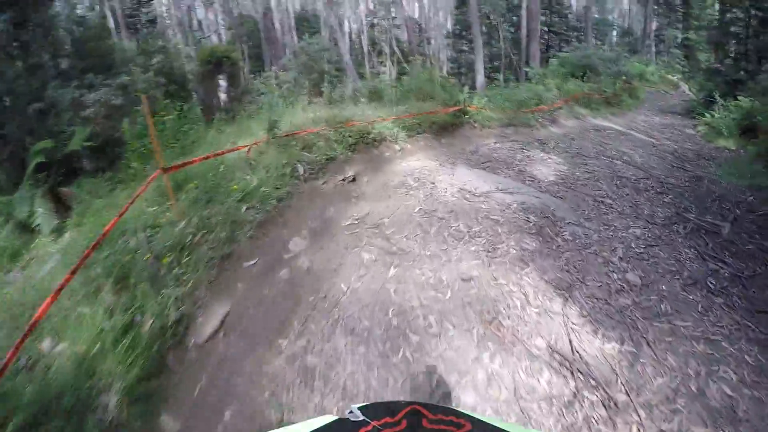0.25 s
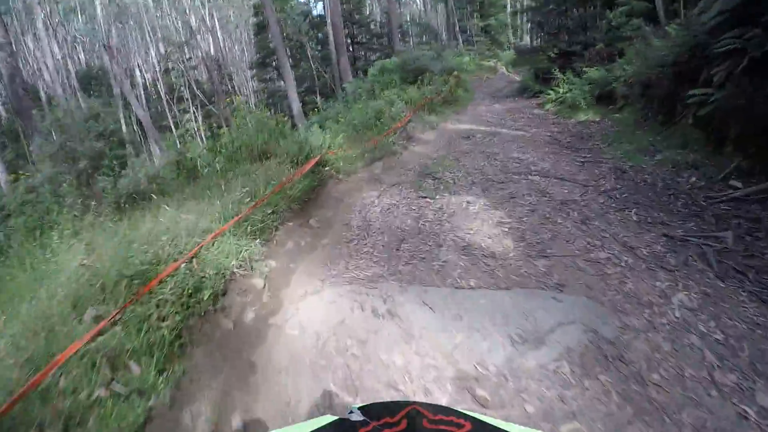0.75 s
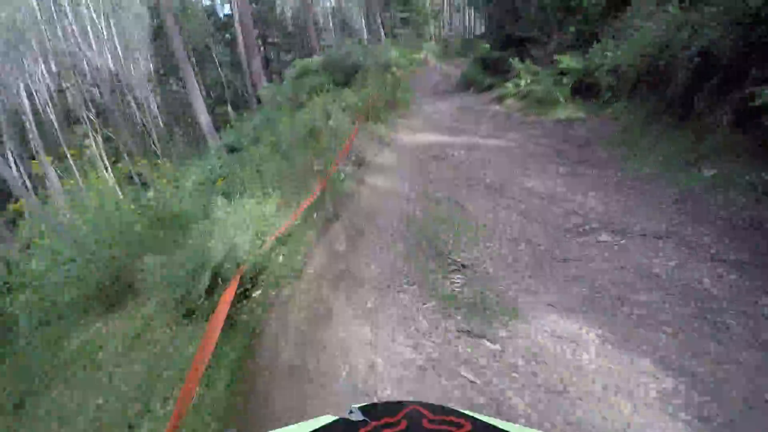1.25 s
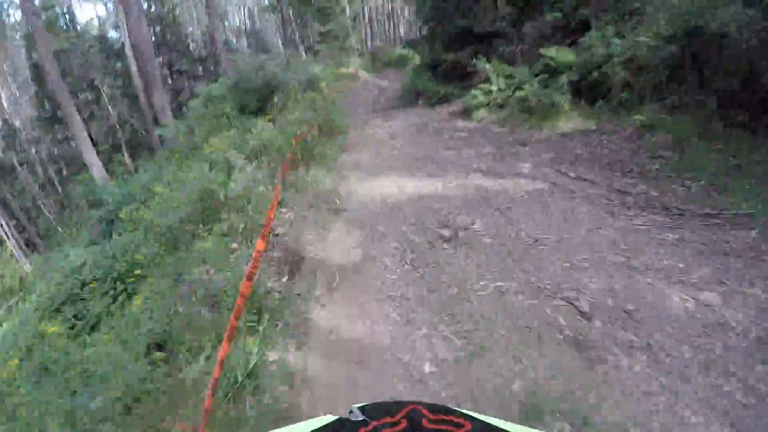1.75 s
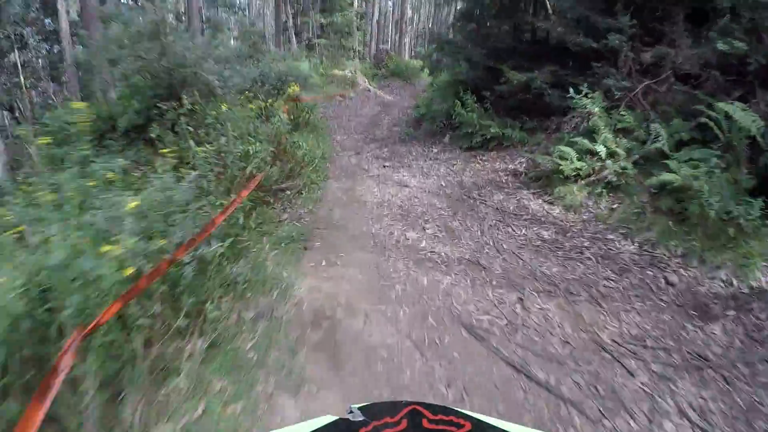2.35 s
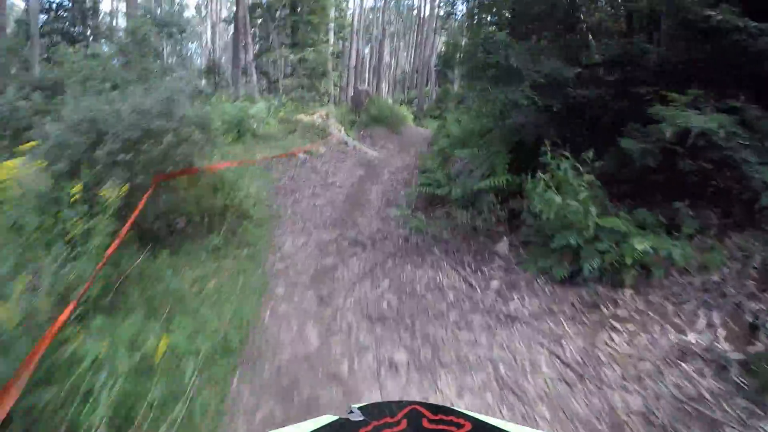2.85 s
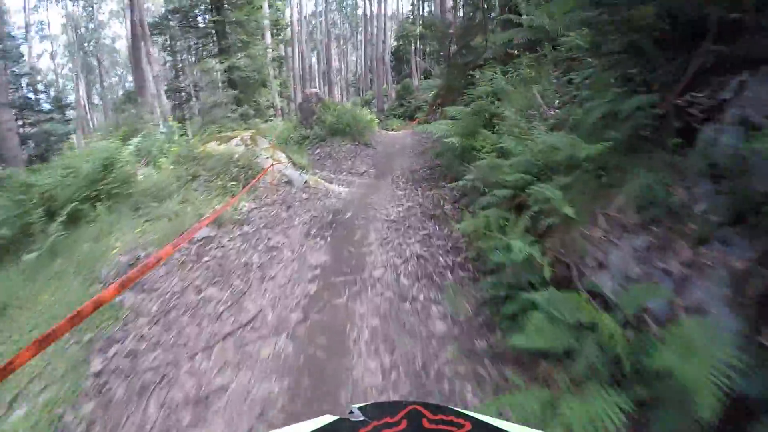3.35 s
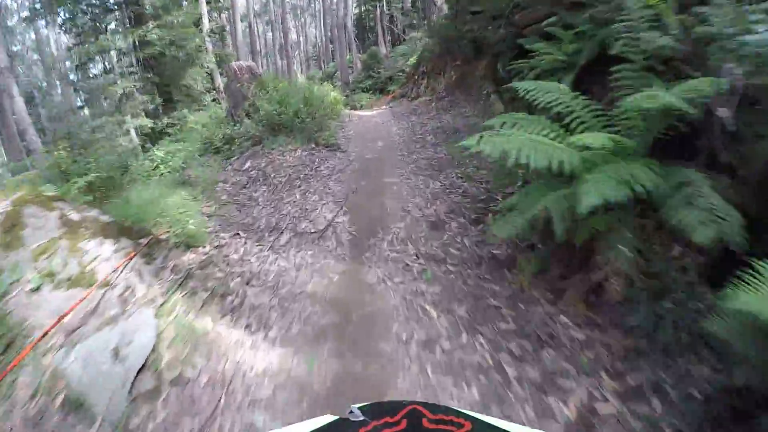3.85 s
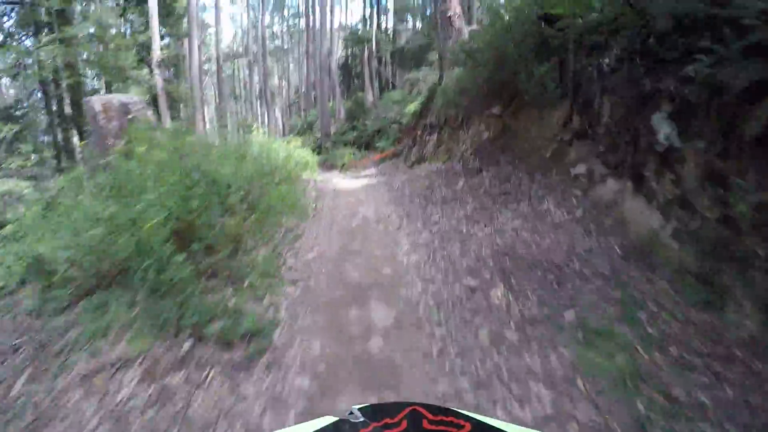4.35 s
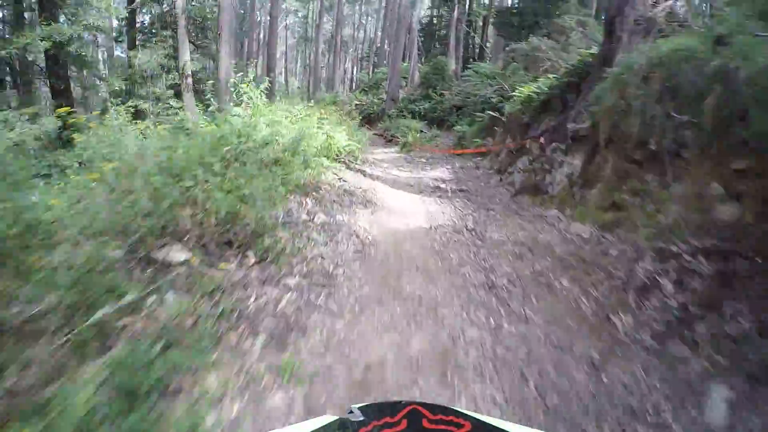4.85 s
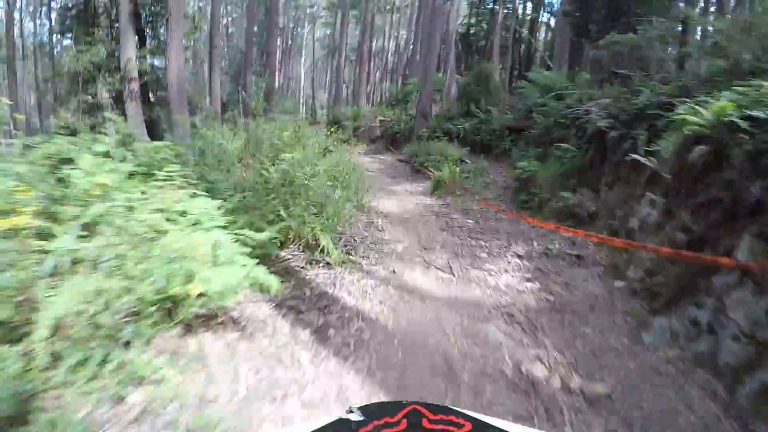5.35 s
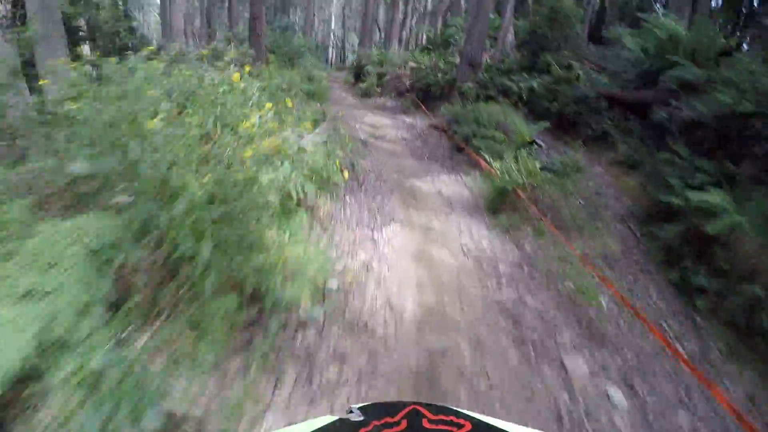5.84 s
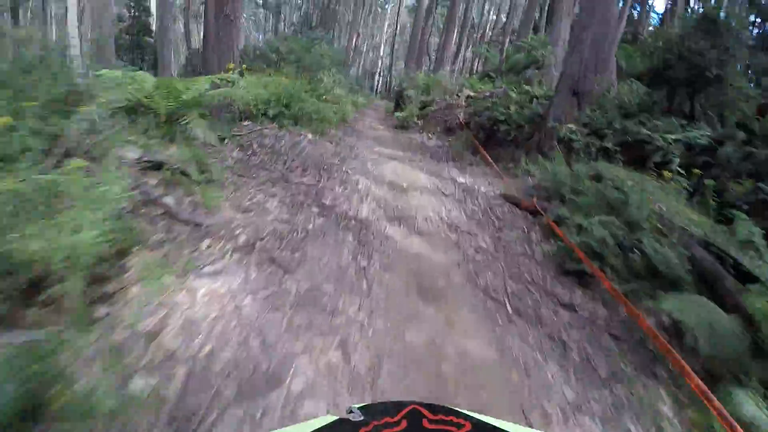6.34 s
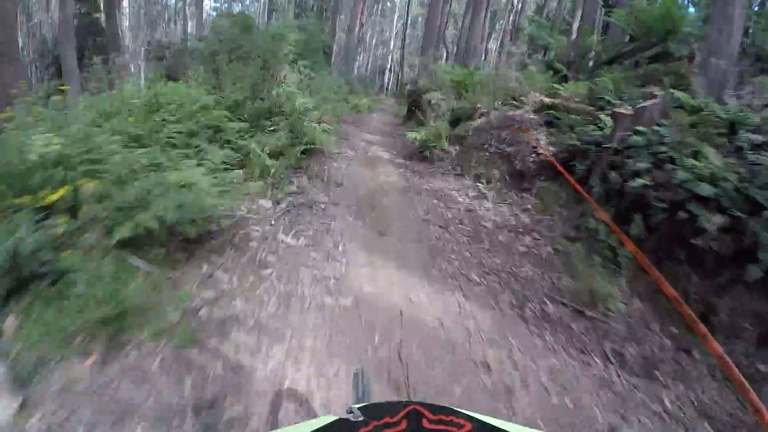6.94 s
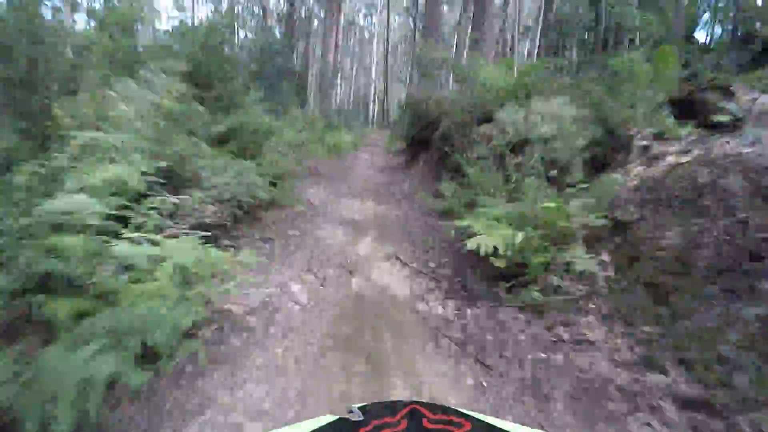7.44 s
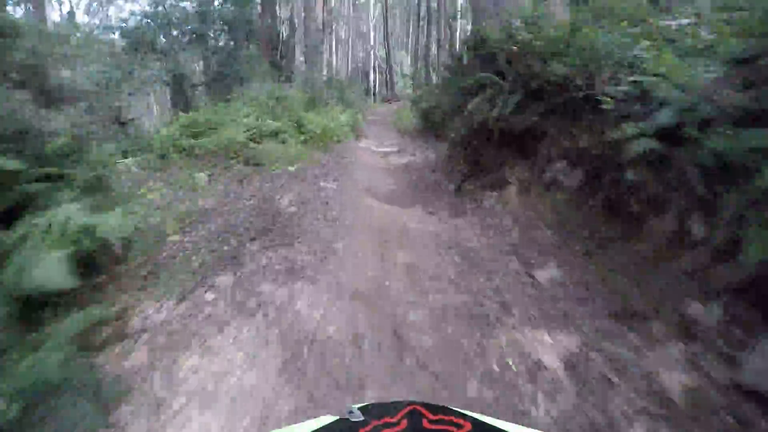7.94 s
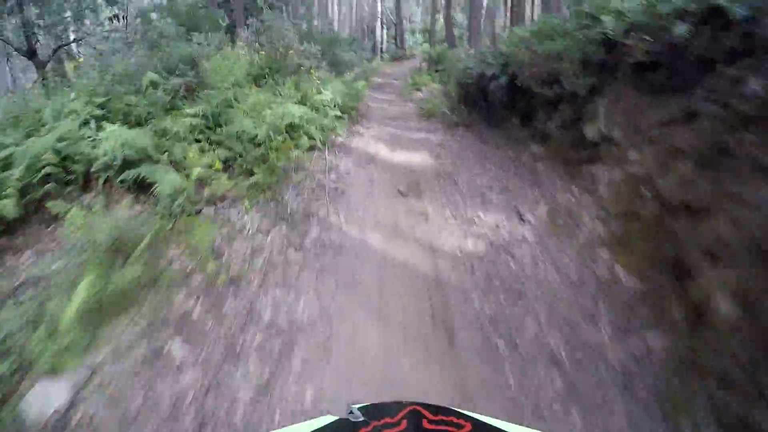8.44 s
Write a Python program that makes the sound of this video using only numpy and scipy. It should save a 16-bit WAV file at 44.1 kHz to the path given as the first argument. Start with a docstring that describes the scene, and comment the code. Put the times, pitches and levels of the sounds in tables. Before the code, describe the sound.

Wind buffets a helmet microphone for the whole of a fast mountain bike descent, nearly nine seconds, in irregular low gusts with a hollow drone and occasional dull thumps. Below it, tyres crunch faintly over dirt, with small twig snaps. In the first two seconds the tread scuffs briefly several times and the bike knocks over bumps, most clearly at about 0.1, 0.7 to 1.0 and 1.8 to 1.9 seconds. From about 1 second a fluttering hiss of air through the helmet's gaps rises with speed, and is strong by 3 seconds. A couple of faint snaps come near 4.4 seconds. At about 5.9 seconds a stone hits the bike with one loud, bright, very short crack. The rushing air then grows louder, surging hardest between 7.3 and 8 seconds, and carries on with the buffeting to the end.

```python
"""Mountain bike on a dirt trail

A fast descent, from a camera microphone on the rider's helmet. Right at the microphone, wind buffets
the housing and hisses through the helmet's gaps, louder and brighter with speed. A body's length
below, the tyres crunch over litter, the bike knocks on bumps, and one stone cracks sharply against it."""
import sys
import numpy as np
from scipy import signal
from scipy.fft import rfft, irfft, next_fast_len
from scipy.io import wavfile
from scipy.ndimage import uniform_filter1d, map_coordinates

SR = 44100
rng = np.random.default_rng(int(sys.argv[2]) if len(sys.argv) > 2 else 0)


def wrap_up_sound(samples):
    """Save the sound to the file named by the first command line argument, as 16-bit audio."""
    columns = np.atleast_2d(samples).T
    # keep every value between -1 and 1, then stretch to whole-number steps
    tamed = np.clip(columns, -1, 1)
    steps = np.round(tamed * 32767).astype(np.int16)
    wavfile.write(sys.argv[1], SR, steps)


N = 383229

# spectra of the tyres, rolling and sliding: (frequency [Hz], level [dB])
ROLL_SPECTRUM = [(120, 22), (300, -5), (750, -2), (1200, 0), (1600, -2), (2300, 6), (3000, -12),
                 (4200, -26.5), (6000, -27), (9000, -36)]
SCUFF_SPECTRUM = [(1000, -6.5), (1400, -1), (1900, 8), (2550, 6), (2850, -5), (3450, 4), (3900, -8),
                  (4700, -9), (6000, -18), (7200, -28), (7950, -14), (8700, -29), (14000, -36)]
# the tread scuffing over dirt: (time [s], level [dB], half-length [s], rasp pitch [Hz])
SCUFFS = [(0.032, -48.5, 0.2, 2010), (0.202, -51, 0.042, 3240), (0.44, -41, 0.02, 2570),
          (0.503, -43.5, 0.039, 2500), (0.624, -46.5, 0.023, 2480), (0.721, -50, 0.039, 2620),
          (0.808, -52, 0.056, 2150), (1.091, -47.5, 0.036, 2430), (1.276, -40, 0.047, 2000),
          (1.358, -49, 0.037, 2080), (1.743, -42.5, .022, 2200), (2.225, -61, 0.054, 2200)]
# bumps knocking the bike: (time [s], level [dB], hardness [dB per octave above the lowest mode])
KNOCKS = [(0.112, -32.5, -3), (0.508, -40, -5), (0.6769, -33, -7), (0.897, -30, -.5), (1.0008, -32, 2),
          (1.0624, -43, -5), (1.8148, -36, -2), (1.903, -33, -5)]
# the frame's ring: (frequency [Hz], level [dB], t60 [s])
FRAME_MODES = [(1130, -1.5, .027), (1450, 1, .013), (1900, 1, .011), (2190, -1, .018), (2560, -8, .013),
               (3200, -11, .014), (4030, -13, .012)]
# twigs and grit snapping under the tyres: (time [s], level [dB], pitch [Hz])
SNAPS = [(.188, -49, 3900), (0.22, -40, 2830), (.223, -55, 5300), (0.441, -48, 5000), (0.472, -52, 5500),
         (.481, -50, 7200), (0.49, -41, 2900), (0.491, -41.5, 5000), (.492, -52, 8500), (.643, -50, 3900),
         (.924, -50, 4700), (1.623, -52, 4800), (1.691, -52, 5000), (1.786, -49, 5360), (1.829, -51, 7800),
         (1.892, -53, 5000), (2.087, -46, 5330), (2.73, -52, 7400), (4.359, -41, 5500), (4.385, -40, 5500),
         (8.57, -38, 7950), (8.571, -47, 13500)]
# a stone's strike: (time [s], level [dB])
STONE_STRIKES = [(5.8803, 1.5)]
# its ring, the low modes coming last: (frequency [Hz], level [dB], t60 [s], delay [s])
STONE_MODES = [(2300, -13, .005, .0008), (2660, -3, .005, .0008), (2940, -14, .008, .003),
               (4900, -8, .0055, 0), (5390, 0, .002, 0), (6050, -12, .003, 0), (6800, -1, .0022, 0),
               (7350, -5, .003, 0), (7900, -6, .0035, 0), (11200, 0, .0013, 0), (13400, -1, .0013, 0)]

# spectra of the wind on the microphone: (frequency [Hz], level [dB])
EDDY_SPECTRUM = [(8, -24), (17, 5.5), (23, 9.5), (30, 5.5), (40, 0), (52, -6.5), (70, -28.5), (110, -50),
                 (250, -67), (600, -100)]
BURBLE_SPECTRUM = [(60, 0), (130, -2), (220, -2.5), (400, -12), (900, -19), (2500, -58)]
DRONE_SPECTRUM = [(35, -67), (58, -5.5), (85, 4.5), (97, -1), (112, -20.5), (150, -43), (250, -60),
                  (700, -79)]
THUMP_SPECTRUM = [(50, -16), (100, 12), (200, -3), (400, -13.5), (1200, -48), (3000, -120)]
# gusts that buffet the microphone: (time [s], level [dB], half-length [s])
GUSTS = [(0.12, -17.5, 0.024), (0.355, -12.5, 0.022), (0.458, -9.5, 0.037), (0.594, -13.5, 0.015),
         (0.802, -20, 0.091), (1.087, -15.5, .035), (1.235, -12.5, 0.051), (1.382, -13, 0.028),
         (1.508, -10, .03), (1.768, -15.5, 0.065), (1.912, -15.5, .06), (2.058, -7.5, 0.035),
         (2.343, -14.5, 0.018), (2.583, -17, 0.049), (2.714, -12, 0.037), (2.914, -18.5, 0.081),
         (3.037, -9.5, 0.031), (3.367, -11.5, 0.026), (3.487, -12.5, 0.017), (3.919, -19, 0.021),
         (4.004, -12.5, 0.023), (4.092, -8.5, .03), (4.228, -12.5, 0.047), (4.338, -9, 0.036),
         (4.446, -11.5, 0.033), (4.68, -19, 0.04), (4.831, -11, 0.042), (5.07, -13.5, 0.045),
         (5.161, -14, 0.025), (5.388, -10, 0.059), (5.613, -21, 0.035), (5.74, -14, 0.13),
         (5.974, -9, 0.032), (6.115, -12.5, .035), (6.245, -10.5, 0.033), (6.42, -9, 0.071),
         (6.59, -17, 0.065), (6.702, -7.5, 0.042), (6.843, -8, 0.015), (7.046, -17.5, 0.027),
         (7.471, -8, 0.049), (7.588, -13, 0.039), (7.745, -18, 0.076), (7.944, -9, 0.065), (8.2, -10, 0.05),
         (8.372, -8.5, 0.037), (8.601, -9, 0.047)]
# lulls in the eddies between them: (time [s], drop [dB], half-length [s])
LULLS = [(.25, 8, 0.053), (.7, 3.5, 0.11), (2.43, 5, 0.064), (7.2, 10, 0.27)]
# the drone of the microphone's housing: (time [s], level [dB])
DRONE_LEVEL = [(0.05, -69), (0.24, -38), (0.28, -58), (0.42, -24), (0.67, -48), (1.06, -52), (1.52, -33),
               (1.67, -50), (1.71, -35), (1.95, -46), (2.1, -30), (2.16, -58), (2.22, -29), (3.15, -36),
               (4.35, -34.5), (4.46, -23.5), (4.54, -48), (4.62, -37), (5.9, -34), (5.95, -22), (6.07, -40),
               (6.22, -27), (6.3, -39), (6.63, -32), (6.65, -21), (6.82, -39), (6.84, -29.5), (7.0, -45),
               (7.1, -36), (7.466, -24), (7.68, -39), (7.706, -26.5), (7.826, -35), (7.878, -22.5),
               (8.096, -42), (8.198, -19), (8.254, -49), (8.356, -22.5), (8.502, -42), (8.6, -27.5),
               (8.69, -38)]
# gusts that thump the microphone: (time [s], level [dB])
THUMPS = [(0.416, -31), (0.463, -42), (2.5, -29.5), (4.424, -42), (4.452, -25), (5.387, -29), (6.745, -25),
          (6.844, -31), (7.448, -25.5), (7.906, -29)]

# the air stream past the helmet, rising as the bike gathers speed: (time [s], level [dB])
STREAM_LEVEL = [(0.93, -62), (1.1, -48.5), (1.19, -56), (1.23, -46), (1.47, -49), (1.58, -42.5),
                (1.64, -49.5), (1.84, -41.5), (2.35, -39), (2.38, -36), (2.83, -37.5), (2.89, -34),
                (2.98, -34.5), (3.03, -30.5), (3.05, -33), (3.09, -32), (3.43, -33.5), (3.5, -29.5),
                (3.59, -33), (3.83, -32.5), (4.11, -34.5), (4.13, -31.5), (4.32, -28), (4.41, -33),
                (4.45, -27.5), (4.56, -38.5), (4.86, -35), (5.32, -34.5), (5.42, -29.5), (5.92, -33),
                (5.94, -26.5), (6.05, -28), (6.07, -29), (6.14, -24.5), (6.35, -27.5), (6.4, -25.5),
                (6.46, -28.5), (6.48, -23), (6.5, -31.5), (6.57, -32.5), (6.59, -29), (7.04, -33),
                (7.24, -26), (7.46, -25), (7.48, -18), (7.58, -21), (7.63, -25.5), (7.69, -29), (7.72, -23),
                (7.74, -18.5), (7.8, -26.5), (7.89, -21), (8.45, -26), (8.49, -31), (8.58, -23.5),
                (8.69, -28.5)]
# low roar and treble spray, over what the stream alone gives: (time [s], level [dB])
ROAR_BOOST = [(1.2, -7), (2.3, 0.5), (5.5, -0.5), (6.5, -0.5), (7.05, -2), (7.22, 5), (7.4, 9), (7.56, -2),
              (7.9, -4.5), (8.68, -5)]
SPRAY_BOOST = [(0, 5), (1.2, -8), (2.5, -4), (4.2, -3.5), (5.2, 2), (6.3, 5), (7.4, 0.5), (8.68, 2)]
# spectra of the wind on the helmet: (frequency [Hz], level [dB])
ROAR_SPECTRUM = [(70, -4), (130, 4), (220, -1.5), (300, -6), (390, -4.5), (500, -10), (750, -14),
                 (1200, -5.5), (3000, -52)]
RUSH_SPECTRUM = [(400, -15), (900, -13.5), (1120, -8.5), (1400, -8.5), (1850, -1.5), (2400, 1), (2780, -4),
                 (3500, -8), (4020, -26), (4400, -16.5), (6500, -31), (9000, -73)]
SPRAY_SPECTRUM = [(3000, -1.5), (4100, -3.5), (4500, -1), (6000, -3), (8000, -8), (9200, -10.5),
                  (10500, -14), (12700, -16.5), (14900, -31), (15600, -45)]
# air resonances of the helmet's gaps, main and higher: (frequency [Hz], width [Hz], level [dB])
GAP_MODES = [(3030, 370, -1), (3333, 450, -2), (3604, 336, -3.5)]
EDGE_MODES = [(4360, 250, 10), (4850, 220, -0.5), (5624, 300, 10), (6500, 160, -3), (7020, 220, -6),
              (7820, 430, -3), (10700, 420, -8)]

# how each wind sound follows the stream: (base level at cruising speed [dB], growth [dB per dB])
EDDY_LAW, ROAR_LAW, RUSH_LAW = (-21, 0.033), (-46, 0.46), (-33, 0.7)
HISS_LAW, WHISTLE_LAW, SPRAY_LAW = (-30.5, 1), (-75, 1.3), (-49.5, 0.88)
CRUISE_DB = -30.5  # the stream's strength at cruising speed


def amp(db):
    """Decibels to gain."""
    return 10 ** (np.asarray(db) / 20)


def unit(x):
    """Scale to rms 1."""
    return x / np.sqrt(np.mean(x ** 2) + 1e-20)


def curve(points):
    """(time, value) points joined by straight lines, one value a sample."""
    return np.interp(np.arange(N) / SR, *np.transpose(points))


def wobble(rate):
    """A smooth random curve, rate knots a second."""
    return map_coordinates(rng.standard_normal(N // 16), [np.arange(N) * rate / SR], mode="wrap")


def swell(s, half_length):
    """A bell-shaped envelope around time s."""
    return np.exp(-np.minimum(((np.arange(N) / SR - s) / half_length) ** 2, 20))


def swells(rows):
    """Sum of (time, height, half-length) bells."""
    return sum(height * swell(s, half_length) for s, height, half_length in rows)


def filtered(x, response):
    """Filter x by a gain given as a function of frequency."""
    size = next_fast_len(len(x) + SR // 4)
    return irfft(rfft(x, size) * response(np.fft.rfftfreq(size, 1 / SR)), size)[:len(x)]


def coloured(x, spectrum):
    """x shaped by (Hz, dB) points on a log axis, at rms 1."""
    points_hz, db = np.transpose(spectrum)
    return unit(filtered(x, lambda hz: amp(np.interp(np.log(hz + 1), np.log(points_hz), db))))


def noise(spectrum, samples=N):
    """Steady noise of the given spectrum, at rms 1."""
    return coloured(rng.standard_normal(samples), spectrum)


def band(hz, centre_hz, width_hz):
    """Gain of a steep-sided resonance."""
    return 1 / (1 + ((hz ** 2 - centre_hz ** 2) / ((hz + 1) * width_hz)) ** 2)


def peaks(modes, hz):
    """Summed gain of several resonances."""
    return sum(amp(db) * band(hz, centre, width) for centre, width, db in modes)


def turbulence(rate, depth_db):
    """White noise that comes in irregular puffs, rate a second."""
    return rng.standard_normal(N) * amp(depth_db * wobble(rate))


def swirl(spectrum, evenness):
    """Low pressure swings of random period and fairly even strength."""
    swings = noise(spectrum)
    power = uniform_filter1d(np.abs(signal.hilbert(swings)) ** 2, size=SR // 32)
    return unit(swings / (np.sqrt(np.abs(power)) + 0.025) ** evenness)


def driven(law):
    """Gain of a sound that grows with the air stream, which takes a moment to change."""
    base_db, growth = law
    stream_db = uniform_filter1d(curve(STREAM_LEVEL), size=SR // 22)
    return amp(base_db + growth * (stream_db - CRUISE_DB))


def microphone_hiss():
    """The microphone's own faint hiss."""
    return amp(-69.5) * noise([(1000, 4.5), (14800, 1.5), (15600, -30)])


def buffeting(ceiling=0.7):
    """Gusts push on the microphone over weaker eddies; the hardest thump, and its hollow housing drones."""
    bed = driven(EDDY_LAW) * amp(2.5 * wobble(12) - swells(LULLS))
    gusts = swells([(s, amp(db), half_length) for s, db, half_length in GUSTS])
    eddies = np.hypot(bed, gusts) * swirl(EDDY_SPECTRUM, evenness=1)
    drone = amp(curve(DRONE_LEVEL) + 0.5 + 1.8 * wobble(14)) * swirl(DRONE_SPECTRUM, evenness=0.3)
    thumps = swells([(s, amp(db - 3.5), 0.0071) for s, db in THUMPS]) * swirl(THUMP_SPECTRUM, evenness=1)
    burble = amp(-40) * eddies * noise(BURBLE_SPECTRUM)  # the rough edge of each eddy
    pressure = eddies + burble + drone + thumps
    return pressure / (1 + (pressure / ceiling) ** 4) ** 0.25  # rounds off the biggest swings


def tyres(grains_per_s=1500, grain_t60_s=0.0082):
    """Down at the trail, the tread rolls over dirt that crumbles in clumps of tiny grains."""
    rolling = amp(-47 + wobble(7.5)) * noise(ROLL_SPECTRUM)
    sizes = amp(1.5 * rng.standard_normal(N).clip(-2, 2) + 1.2 * wobble(25).clip(-2, 2))
    grains = (rng.random(N) < grains_per_s / SR) * sizes
    fade = amp(-60 * np.arange(SR // 20) / SR / grain_t60_s)
    crumbling = signal.fftconvolve(grains, fade)[:N] * rng.standard_normal(N)
    dirt_spectrum = [(500, 13), (1200, 10), (2200, 15.5), (3500, -10),
                     (4000, 6), (5000, -1), (8000, -5), (14000, -26)]
    return rolling + amp(-59) * coloured(crumbling, dirt_spectrum)


def scuffs():
    """The tread slides briefly; each slide rasps at its own pitch."""
    out = np.zeros(N)
    for s, db, half_length, pitch_hz in SCUFFS:
        envelope = swell(s, half_length)
        span = np.flatnonzero(envelope > 0.001)
        scrape = noise(SCUFF_SPECTRUM, len(span))
        rasp = unit(filtered(rng.standard_normal(len(span)), lambda hz: band(hz, pitch_hz, width_hz=160)))
        out[span] += amp(db) * envelope[span] * unit(scrape + amp(-3) * rasp)
    roughness = unit(amp(1.4 * wobble(260)))
    return out * roughness


def knocks(clack_t60_s=0.016, attack_s=0.0013):
    """Each bump clacks and rings the frame's damped modes; a soft one leaves mostly the hollow lowest."""
    out, t = np.zeros(N + SR), np.arange(SR // 10) / SR
    hz, level, t60 = np.transpose(FRAME_MODES)[:, :, None]
    clack_spectrum = [(300, -26), (800, -5), (1150, -4), (2200, -2), (4000, -19), (9000, -42)]
    for s, db, hardness in KNOCKS:
        mode_db = level + hardness * np.log2(hz / hz[0]) + 0.64 * rng.standard_normal(hz.shape)
        modes = amp(mode_db - 60 * t / t60) * np.sin(2 * np.pi * (hz * t + rng.random(hz.shape)))
        clack = amp(hardness - 1 - 60 * t / clack_t60_s) * noise(clack_spectrum, len(t))
        knock = (modes.sum(0) + clack) * (1 - np.exp(-t / attack_s))
        out[round(s * SR):][:len(t)] += amp(db + 3.2) * knock / np.abs(knock).max()
    return out[:N]


def snaps(t60_s=0.038, attack_s=0.00039):
    """Twigs and grit give way under the tyres, each with a short burst around its own pitch."""
    out, t = np.zeros(N + SR), np.arange(SR // 20) / SR
    envelope = amp(-60 * t / t60_s) * (1 - np.exp(-t / attack_s))
    for s, db, pitch_hz in SNAPS:
        burst = filtered(rng.standard_normal(len(t)), lambda hz: band(hz, pitch_hz, 0.6 * pitch_hz) ** 2)
        out[round(s * SR):][:len(t)] += amp(db + 0.5) * unit(burst) * envelope
    return out[:N]


def shell_roar():
    """Turbulent air roars over the helmet's shell, just under the microphone."""
    gain = driven(ROAR_LAW) * amp(curve(ROAR_BOOST) + 0.44 * wobble(8))
    return gain * coloured(turbulence(rate=79, depth_db=-1), ROAR_SPECTRUM)


def gap_hiss(waver_share=0.011):
    """Air sings in the helmet's gaps, its pitch wandering as the angle of the stream changes."""
    gaps = lambda hz: peaks(GAP_MODES, hz) * band(hz, 3310, width_hz=1080)
    hiss = driven(HISS_LAW) * unit(filtered(turbulence(rate=310, depth_db=1), gaps))
    position = np.arange(N) + np.cumsum(waver_share * wobble(9))
    return map_coordinates(hiss, [position], order=4, mode="mirror")


def gap_whistle():
    """One thin gap sings high up, heard only in a fast stream."""
    thin_gap = lambda hz: band(hz, 10430, width_hz=470)
    return driven(WHISTLE_LAW) * unit(filtered(turbulence(rate=110, depth_db=-1), thin_gap))


def edge_spray():
    """Air sprays off the edges of the gaps, bright with their higher resonances."""
    edges = filtered(turbulence(rate=180, depth_db=0.74), lambda hz: 1 + peaks(EDGE_MODES, hz))
    return driven(SPRAY_LAW) * amp(curve(SPRAY_BOOST)) * coloured(edges, SPRAY_SPECTRUM)


def airstream():
    """Wind on the helmet, close up: above the roar, the rushing stream flutters as eddies pass."""
    roar = shell_roar()
    rush = driven(RUSH_LAW) * coloured(turbulence(rate=160, depth_db=0.1), RUSH_SPECTRUM)
    stream = rush + gap_hiss() + gap_whistle() + edge_spray()
    flutter = unit(amp(0.25 * wobble(12) + 0.13 * wobble(30) + 0.71 * wobble(90)))
    return roar + flutter * stream


def stone(attack_s=0.00012, low_cut_hz=1700):
    """A flung stone hits the bike: a bright crack, then a brief lower ring, heard through the housing."""
    out, t = np.zeros(N + SR), np.arange(SR // 20) / SR
    hz, level, t60, delay = np.transpose(STONE_MODES)[:, :, None]
    age = np.maximum(t - delay, 0)
    envelopes = amp(level - 60 * age / t60) * (1 - np.exp(-age / attack_s))
    ring = (envelopes * np.sin(2 * np.pi * hz * age)).sum(0)
    housing_dip = lambda f: 1 - band(f, 9400, width_hz=1500)
    low_cut = lambda f: 1 - np.exp(-(f / low_cut_hz) ** 4)
    crack = filtered(ring, lambda f: housing_dip(f) * low_cut(f))
    for s, db in STONE_STRIKES:
        out[round(s * SR):][:len(t)] += amp(db) * crack
    return out[:N]


def scene():
    """Wind close up and the bike below, in mono at the helmet microphone."""
    wind = buffeting() + airstream()
    bike = tyres() + scuffs() + knocks() + snaps() + stone()
    return (wind + bike + microphone_hiss())[None]


def record(dry):
    """The camera overloads at full scale and keeps nothing above its band limit."""
    top_hz = 16200
    return filtered(np.clip(dry[0], -1, 1), lambda hz: 1 / (1 + (hz / top_hz) ** 110))[None]


dry = scene()
out = record(dry)
wrap_up_sound(out)
```